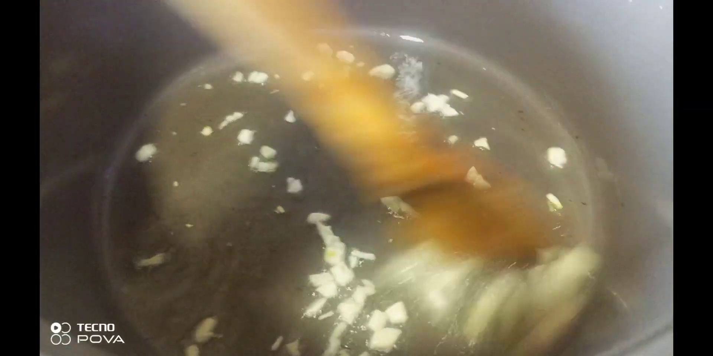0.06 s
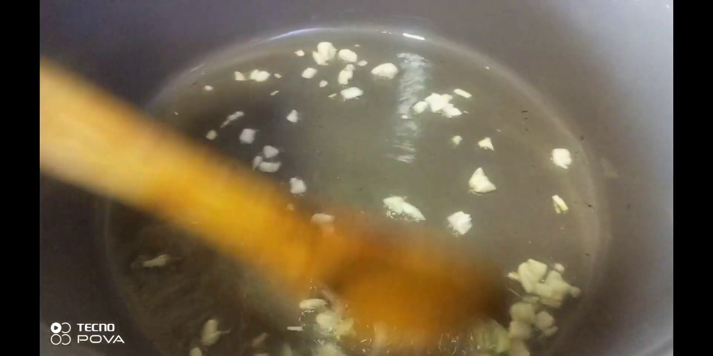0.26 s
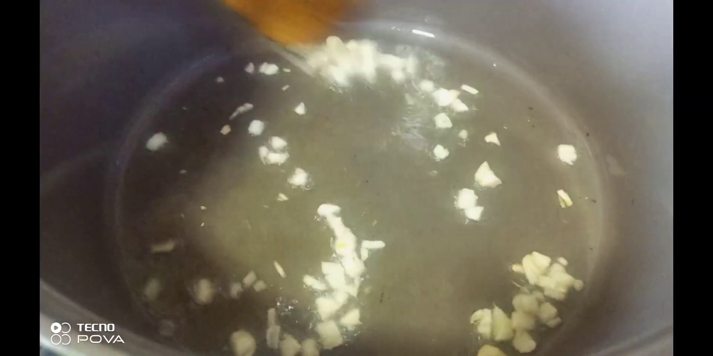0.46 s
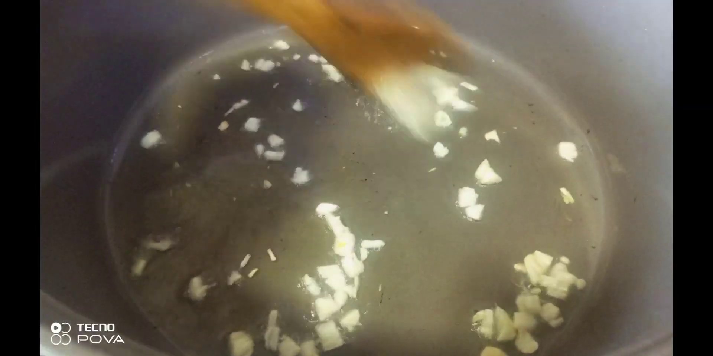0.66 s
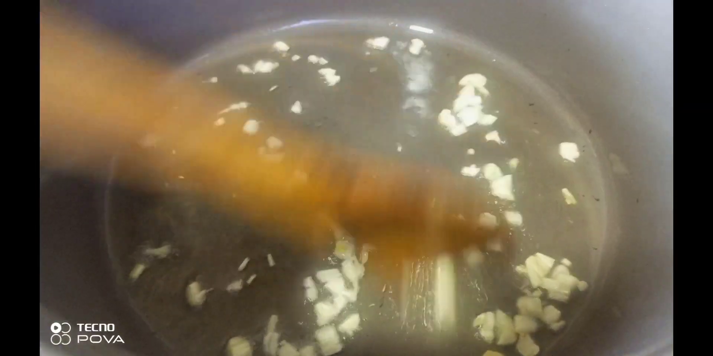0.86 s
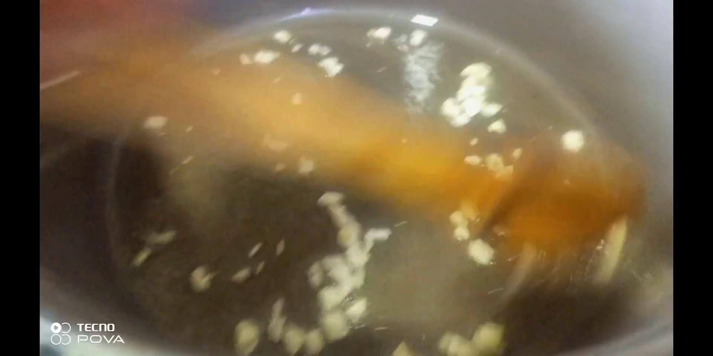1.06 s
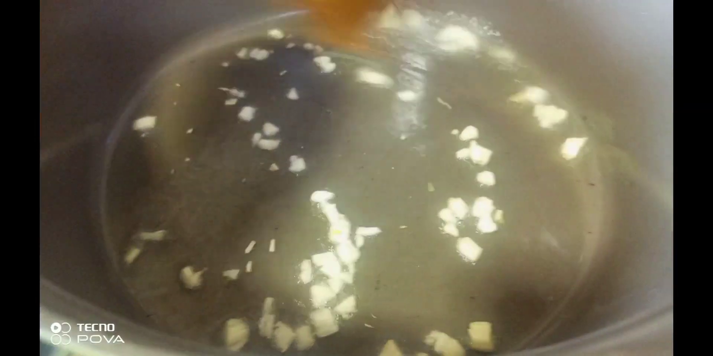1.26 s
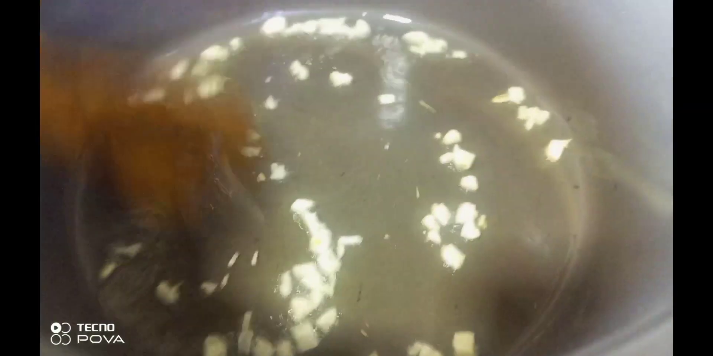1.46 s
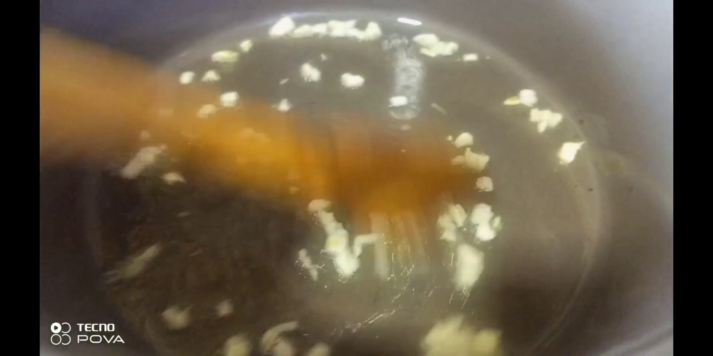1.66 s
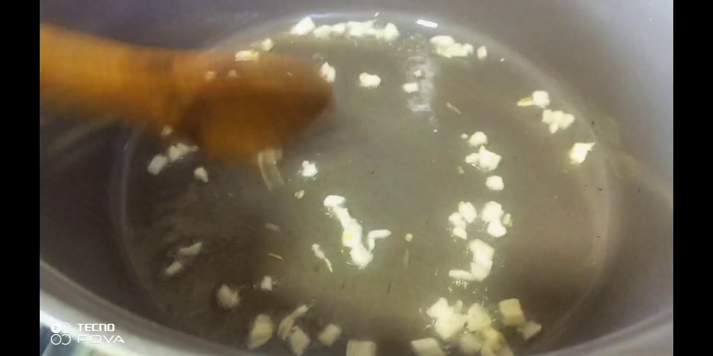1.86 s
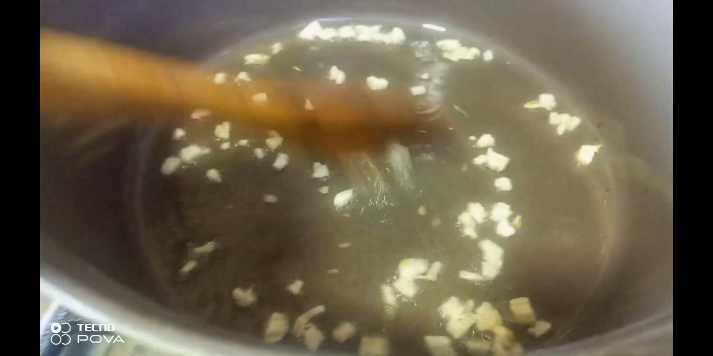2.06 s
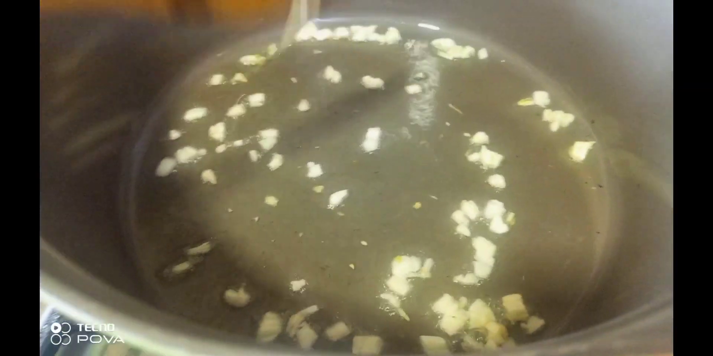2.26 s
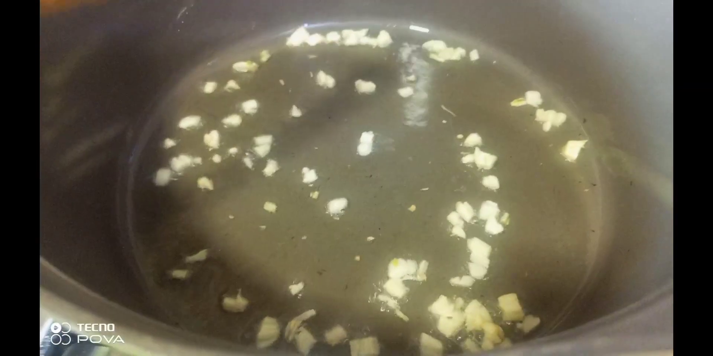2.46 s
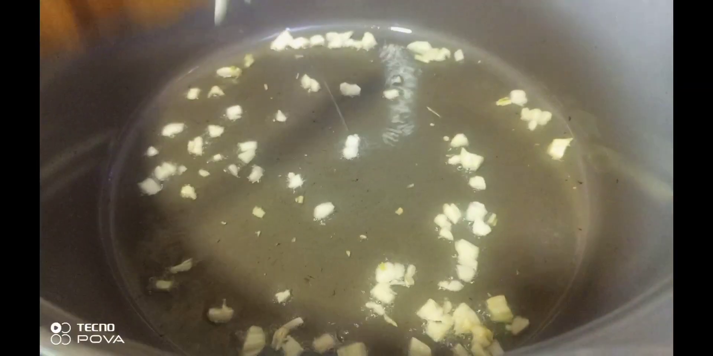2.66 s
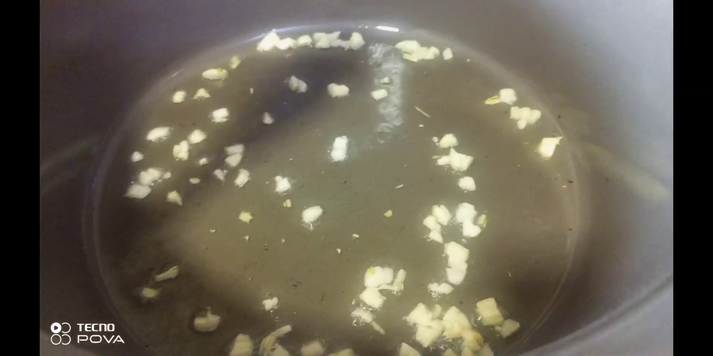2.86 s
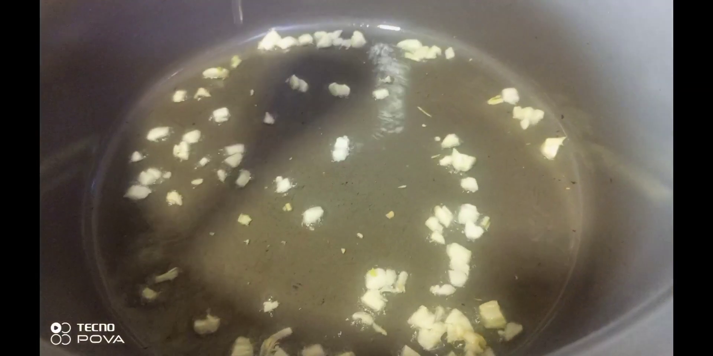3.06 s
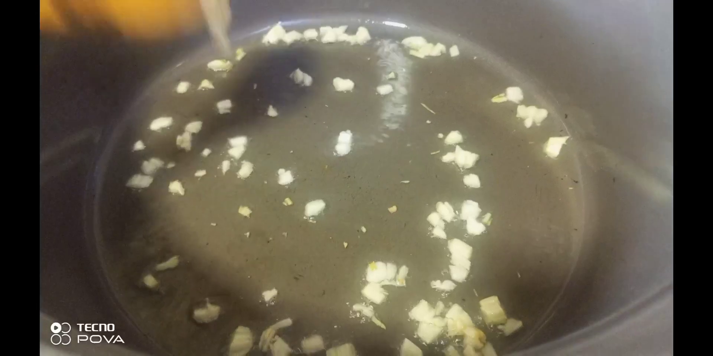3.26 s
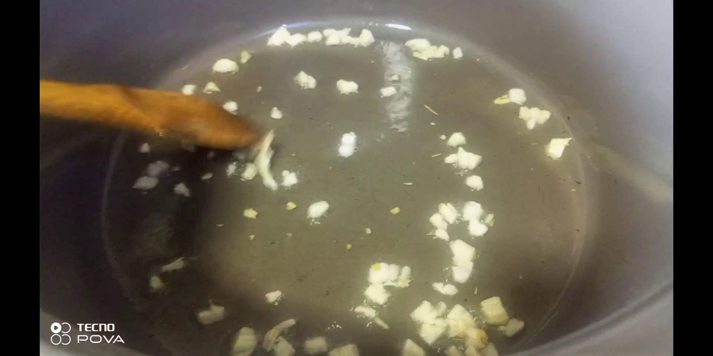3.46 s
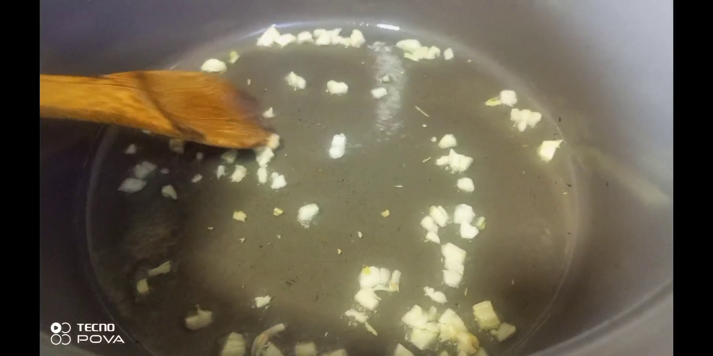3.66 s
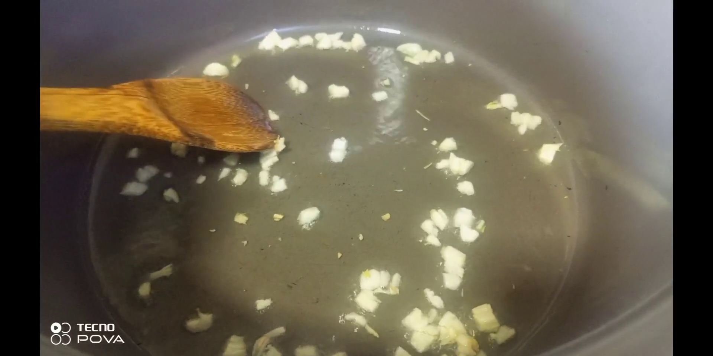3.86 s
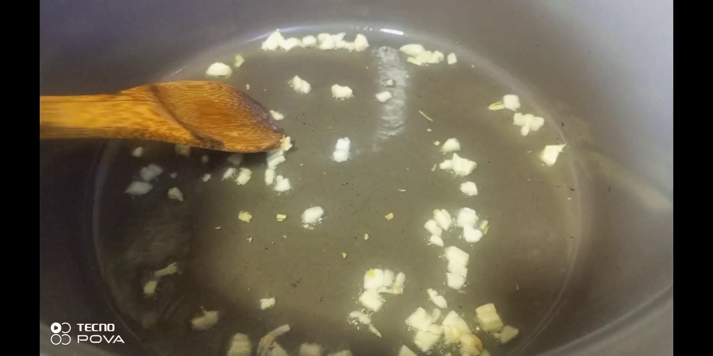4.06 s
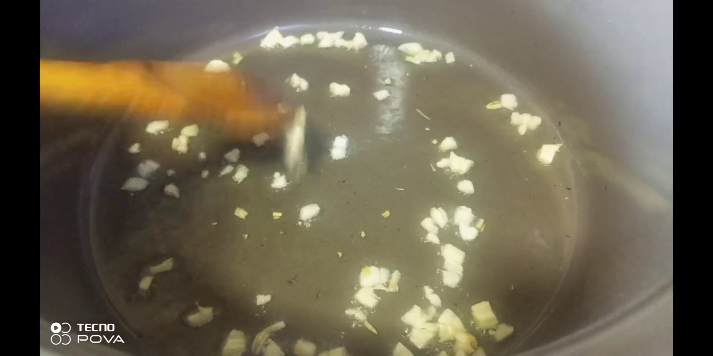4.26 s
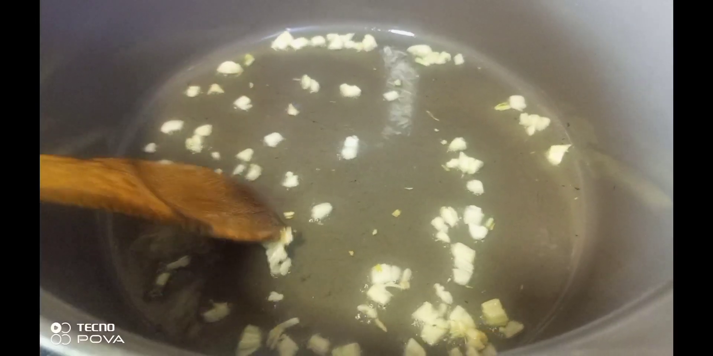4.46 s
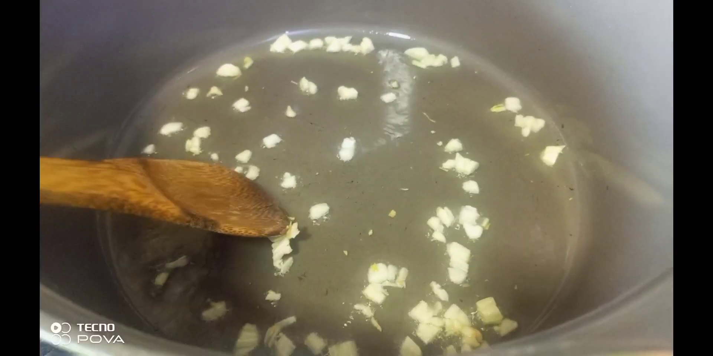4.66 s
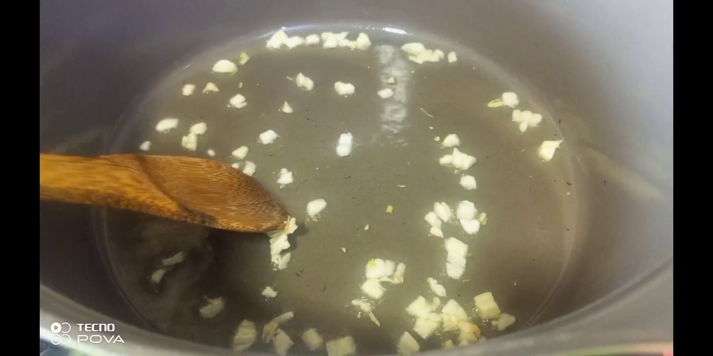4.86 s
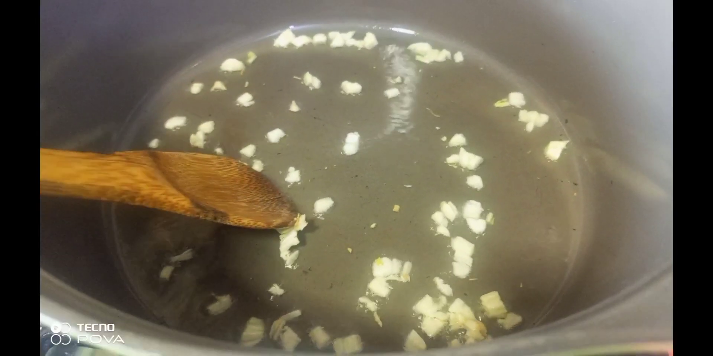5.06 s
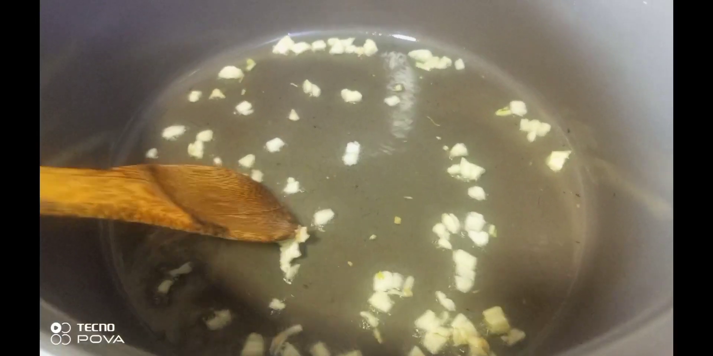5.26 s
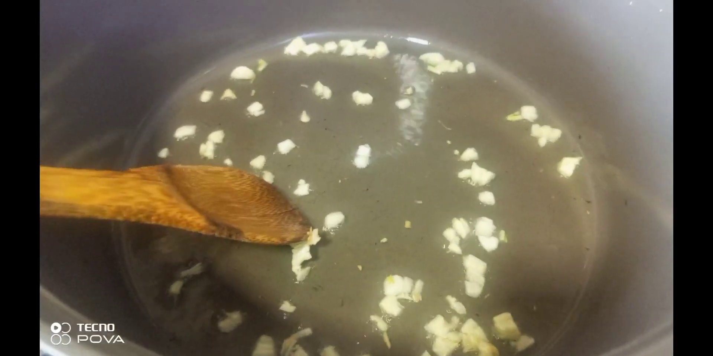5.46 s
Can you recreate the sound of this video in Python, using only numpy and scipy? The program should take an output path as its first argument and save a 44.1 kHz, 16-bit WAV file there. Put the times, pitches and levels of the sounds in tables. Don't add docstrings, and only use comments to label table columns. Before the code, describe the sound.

Steady light sizzling of oil with sharp, ringing pops and tiny droplet ticks, heard close and fairly dry. Two small wooden clicks and light taps come during stirring, followed by stronger knocks on the pot's rim, the last one doubled. Each knock rings briefly and thumps the stove, the tail cut short by phone noise reduction; then only soft, sparse frying remains.

```python
import sys
import numpy as np
from scipy import signal
from scipy.fft import rfft, irfft, next_fast_len
from scipy.io import wavfile
from scipy.ndimage import uniform_filter1d

SR = 44100
rng = np.random.default_rng(int(sys.argv[2]) if len(sys.argv) > 2 else 0)


def voltage_ratio(level):
    return 10 ** (np.asarray(level, float) / 20)


def transcribe(signal):
    frames = np.atleast_2d(signal).T
    limited = np.clip(frames, -1, 1)
    pcm = np.round(limited * 32767).astype(np.int16)
    wavfile.write(sys.argv[1], SR, pcm)


N = 242991

# (frequency [Hz], density [dB])
FIZZ_SPECTRUM = [(350, -75), (600, -21), (705, -30.5), (899, -16), (1230, -19.5), (1380, -8.5), (1530, -15),
                 (1820, -10), (2240, -9), (5650, 4), (6720, 4), (7990, -7.5), (9500, -9), (12400, -47),
                 (20900, -120)]
# (frequency [Hz], density [dB])
AIR_SPECTRUM = [(4120, -26), (7000, -6), (8310, -22), (9970, -10.5), (12400, -22.5), (13700, -15.5),
                (14800, -7.5), (15600, -7)]
# (frequency [Hz], density [dB])
HUM_SPECTRUM = [(15, -50), (25, -11), (48, -9), (119, -7.5), (230, -12.5), (465, -8.5), (687, -27),
                (900, 3), (1170, -26), (1980, -120)]
# (frequency [Hz], density [dB])
WOOD_SPECTRUM = [(290, 1), (500, -43), (709, -26), (906, -4), (1560, -2.5), (2690, 2), (3100, 1), (3660, 0),
                 (5760, 2), (11000, -43), (14300, -76), (22000, -120)]
# (time [s], fizz level [dB])
STIR = [(0, -53.5), (.85, -56.5), (1.6, -54.5), (2.06, -56), (2.44, -59.5), (2.7, -58), (3.11, -59),
        (3.6, -58), (4.24, -60), (4.87, -60), (5.51, -59)]
# (time [s], length [s], air lift [dB])
SWEEPS = [
    (1.196, 0.72, 2),
    (1.82, 0.52, 4),
]

# (time [s], peak [dB], pitch [Hz], tail t60 [s])
LARGE_POPS = [(0.042, -32, 4400, 0.13), (0.1, -33.5, 5140, 0.13), (.161, -33, 4330, 0.1),
              (0.223, -35.5, 4670, 0.13), (0.449, -37.5, 4870, 0.13), (0.82, -30.5, 4357, 0.092),
              (0.875, -41.5, 4650, 0.23), (1.12, -29, 5030, 0.12), (1.3793, -30.5, 4560, 0.14),
              (1.7873, -42.5, 3250, 0.15), (1.878, -40, 4240, 0.27), (1.925, -33, 5110, 0.089),
              (1.9394, -37, 5010, 0.17), (2.05, -47.5, 4330, 0.28), (2.151, -40, 4430, 0.15),
              (2.2795, -36, 4330, 0.15), (2.3077, -35, 4025, 0.19), (2.523, -30.5, 4510, 0.1),
              (2.554, -32, 4080, 0.14), (2.653, -40.5, 3770, 0.13), (2.82, -38.5, 4850, 0.13),
              (2.9798, -37, 4420, 0.18), (3.106, -37, 4750, 0.21), (3.3479, -35.5, 4800, 0.18),
              (3.525, -36, 3764, 0.16), (4.6445, -37, 4880, 0.17), (5.202, -39, 4960, 0.27)]
# (time [s], peak [dB], pitch [Hz], tail t60 [s])
MIDDLE_POPS = [(0.1668, -31, 5250, 0.078), (0.222, -36, 5770, 0.096), (.2768, -48, 5590, .11),
               (.823, -34, 5300, 0.12), (1.054, -36, 5910, 0.16), (1.102, -30, 5700, 0.063),
               (1.1216, -28, 5470, 0.052), (1.5641, -31.5, 5770, 0.13), (1.7513, -27.5, 5770, 0.19),
               (1.8978, -37.5, 5500, 0.088), (1.9257, -28.5, 5526, 0.099), (2.052, -28.5, 5780, 0.16),
               (2.119, -34.5, 5740, 0.09), (2.3322, -38, 6090, 0.088), (2.4453, -42, 5880, .1),
               (3.002, -37.5, 5710, 0.17), (3.3437, -31.5, 5400, 0.097), (3.3756, -34, 5650, 0.089),
               (3.3838, -32, 5520, 0.066), (3.554, -25, 5780, 0.07), (3.712, -34, 5570, 0.15),
               (4.2515, -26, 5790, 0.24), (4.415, -36.5, 5670, 0.11)]
# (time [s], peak [dB], pitch [Hz], tail t60 [s])
SMALL_POPS = [(0.3328, -35, 6210, 0.084), (0.5497, -25.5, 6010, 0.079), (0.706, -35.5, 6260, 0.14),
              (.9797, -45, 6130, 0.054), (1.218, -30, 6950, 0.086), (1.391, -34, 5920, 0.19),
              (1.474, -28.5, 7000, 0.043), (1.866, -37, 6560, 0.23), (2.378, -31.5, 6800, 0.13),
              (2.5227, -38, 6630, .086), (2.552, -31.5, 6100, 0.065), (2.6324, -52, 6090, .14),
              (2.645, -29.5, 6260, 0.1), (2.7929, -32, 6020, 0.083), (4.5405, -35.5, 5900, 0.091),
              (4.56, -33.5, 6870, 0.065), (4.916, -42, 6780, 0.12)]
# (time [s], peak [dB], pitch [Hz])
FAINT_POPS = [(0.012, -46, 6400), (0.0233, -47, 6980), (0.414, -38.5, 6010), (0.853, -38, 6000),
              (1.509, -44, 6500), (2.2616, -45, 6800), (2.87, -44.5, 5910), (2.8894, -43, 6420),
              (3.082, -46.5, 6040), (3.4184, -35, 6530), (3.5905, -41.5, 7010), (4.659, -49, 6740),
              (4.7496, -48, 6600), (4.935, -42.5, 6400), (5.434, -45, 5500)]
# (width of pot modes rung [Hz], burst against tail [dB])
BUBBLE_SIZES = [
    (280., -20),
    (420., -3.5),
    (420., -4.5),
    (1200., -2.5),
]
# (time [s], peak [dB], pitch [Hz])
SPITS = [(0.3335, -53, 8900), (0.4798, -47, 8000), (0.8011, -44.5, 8280), (1.1603, -47.5, 8460),
         (1.4746, -44, 8040), (1.9648, -43.5, 8600), (2.6035, -49.5, 9200), (3.9399, -54.5, 10200),
         (4.252, -40.5, 8100), (5.1625, -48, 8900), (5.206, -41.5, 8550)]
# (time [s], peak [dB], pitch [Hz], tail t60 [s])
CRACKS = [(.042, -32.5, 4400, 0.027), (4.5595, -31.5, 6900, 0.035), (4.563, -41, 5600, .05),
          (4.669, -41.5, 6100, 0.16), (.151, -49, 4800, .1), (0.015, -52, 5500, .03),
          (0.022, -41, 5300, .03), (0.42, -46.5, 3530, 0.034), (.265, -46, 3600, 0.09),
          (1.378, -38, 4500, .04)]
# (time [s], peak [dB], pitch [Hz], tail t60 [s])
NARROW_POPS = [(.139, -40, 6240, 0.095), (.3145, -36, 7000, .04), (0.502, -37, 5860, 0.046),
               (0.599, -42.5, 5430, 0.1), (.885, -37.5, 7180, 0.07), (1.096, -33, 5300, 0.065),
               (1.3107, -45.5, 5480, 0.12), (1.757, -26, 6100, 0.031), (1.911, -39, 7140, .05),
               (2.9544, -40.5, 6860, .06), (3.762, -43, 7300, .05), (3.942, -48, 4200, 0.17),
               (3.9865, -42.5, 5750, 0.14), (4.000, -39, 4930, .05), (4.527, -48, 6080, 0.049),
               (5.1597, -52, 5890, .06), (0.0424, -33, 4450, 0.039), (.055, -48, 6500, 0.042),
               (.068, -35, 5600, .06), (.2915, -34, 5700, 0.1), (0.2764, -31, 5540, .04),
               (.7045, -30.5, 6320, 0.033), (4.559, -30, 6810, 0.024), (.115, -46, 6000, .05),
               (1.746, -25, 6250, 0.07), (1.966, -45, 2660, 0.079), (2.02, -47, 5040, .04),
               (2.281, -34.5, 6520, 0.059)]
# (time [s], peak [dB], pitch [Hz])
DROPLETS = [(0.192, -45, 8000), (0.206, -46, 10700), (0.272, -59, 10100), (0.3112, -49, 8000),
            (0.411, -52, 8000), (0.4534, -44, 8000), (0.7248, -55, 8000), (0.7447, -46, 8000),
            (0.8495, -44, 8000), (0.98, -41, 6600), (1.05, -58, 8000), (1.3404, -44, 8300),
            (1.585, -48, 8000), (1.605, -43, 8000), (1.7434, -61, 8000), (1.8414, -50, 8000),
            (2.374, -58, 8000), (2.5237, -42, 7950), (2.9427, -46, 8000), (3.3323, -55, 8000),
            (3.7813, -49, 8000), (4.0542, -50, 8000), (4.123, -47, 7760), (5.3453, -54, 8000)]
# (time [s], peak [dB], centre [Hz], t60 [s])
CONTACTS = [(0.2772, -22, 2730, 0.029), (.2935, -35, 2080, 0.072), (.905, -49, 2100, 0.11),
            (1.664, -49, 2500, .03), (2.552, -40.5, 2050, 0.098), (3.372, -31, 2140, 0.076),
            (3.422, -35, 452, 0.05), (3.523, -44.5, 2140, 0.19), (4.413, -40.5, 1920, 0.22),
            (1.437, -48, 360, 0.087), (3.876, -57, 450, 0.07), (4.68, -50.5, 320, 0.13),
            (.772, -56, 397, 0.071), (1.964, -46, 11000, .05), (.3325, -46, 10500, 0.027),
            (1.473, -42, 7440, 0.008)]

# (frequency [Hz], width [Hz], level
# [dB])
FRYING_MODES = [(302, 9.2, -25.5), (495, 23, -32.5), (904, 6.6, -21.5), (1420, 5, -16), (1857, 40, -31),
                (2690, 23, -14)]
# (frequency [Hz], width [Hz], level [dB])
FLOOR_MODES = [(4400, 19, -1), (5770, 37, 1), (6870, 38, -0.5), (3733, 16, -3.5)]

# (time [s], ring [dB], clatter [dB], clatter t60 [s], suppressor cut after [s])
BLOWS = [
    (.2765, -37.5, -45, 0.16, 0.11),
    (.903, -48, -56, 0.095, 0.079),
    (2.4435, -42.5, -42.5, 0.17, .1),
    (3.372, -32, -36.5, 0.17, 0.18),
    (4.2495, -30, -35.5, 0.26, 0.12),
    (4.412, -40, -42.5, 0.23, 0.083),
]
# (time [s], clatter [dB], clatter t60 [s])
TAPS = [
    (1.376, -54, 0.075),
    (1.6036, -37, 0.041),
    (1.786, -51, 0.11),
    (2.281, -61, 0.08),
    (2.522, -44.5, 0.18),
    (4.054, -64, 0.057),
]
# (time [s], peak [dB], pitch [Hz], tail t60 [s], contact against tail [dB])
CLICKS = [
    (0.2793, -26, 3476, 0.25, 9),
    (0.906, -28, 3540, 0.15, 1.5),
    (1.606, -41, 4710, 0.059, 4),
]
# (frequency [Hz], level [dB], t60 [s])
FLOOR_RINGS = [
    [(1365, -15, 0.22), (2140, -8, 0.086), (2920, 1, 0.14), (3700, -7.5, 0.26), (5530, -9.5, 0.31)],
    [(2410, -9, 0.15), (2710, 2, 0.08), (3700, -1.5, 0.24), (4550, -22, 0.072)],
]
# (frequency [Hz], t60 [s], level at each of the next four blows [dB] x 4)
RIM_MODES = [(1673, 0.062, 6, -21, -30, -27), (1760, 0.36, -16, -36, -19, -15),
             (2070, 0.23, -37, -28, -42, -14), (2100, 0.2, -27, -21, -42, -7),
             (2657, 0.37, -10, -19, -10.5, -8), (3337, 0.19, 0, -10, -4.5, -3.5),
             (3390, 0.28, -14, -13, -8.5, -19), (3697, 0.17, 2, -5, 0.5, -5),
             (3975, 0.24, -7, -19, -6.5, -10), (4097, 0.12, -2, -7, -4.5, -0.5),
             (5590, 0.18, -22, -11, -18, -4), (5480, 0.71, -13, -24, -34, -26),
             (6100, 0.23, -26, -29, -20, -27), (6460, 0.37, -22, -16.5, -15, -24)]
# (time [s], frequency [Hz], level [dB], t60 [s], damped after [s])
BELL_RINGS = [(1.377, 1420, -63, 0.2, .06), (1.789, 1420, -53, 0.13, .1), (1.790, 904, -62, 1.3, 0.053),
              (1.915, 904, -62.5, .87, 0.03), (2.000, 904, -62.5, 0.24, 0.034),
              (2.300, 1445, -60, 0.21, 0.037), (2.4435, 1289, -44, 1.94, 0.66), (3.14, 1270, -76, 1.5, 0.2),
              (2.4432, 1857, -56.5, 0.86, .26), (2.444, 904, -49.5, 4, 0.69),
              (3.150, 904, -65.5, 4.3, 0.17), (3.370, 1365, -51.5, 1.1, .17), (3.372, 904, -43, 0.39, 0.19),
              (3.3721, 1287, -65, 2, 0.3), (3.3718, 1857, -44.5, 0.8, 0.31),
              (4.055, 1857, -66.5, 0.45, .11), (4.0547, 1410, -55.5, 0.074, .05),
              (4.2475, 1857, -49.5, 0.58, 0.18), (4.2495, 904, -44, 1.17, .22),
              (4.2496, 873, -46.5, 0.6, .2), (4.2497, 1372, -52, 1.6, 0.26),
              (4.251, 1290, -43.5, 1.2, 0.166), (4.412, 902, -47, 0.27, 0.066),
              (4.4116, 2354, -54, 0.87, 0.069), (4.414, 1282, -38, 0.8, 0.055)]
# (time [s], frequency [Hz], level
# [dB], t60 [s], damped after [s])
SHORT_RINGS = [(.277, 904, -53.5, 0.21, 0.023), (.28, 305, -71, 0.33, 0.035), (.3, 495, -73, 0.43, 0.056),
               (.549, 904, -66, .4, 0.036), (2.444, 495, -42, 0.24, 0.047), (2.444, 426, -37.5, 0.18, .06),
               (2.445, 1690, -44, .15, .035), (2.444, 931, -48, 0.9, 0.28), (3.952, 2690, -63, 0.18, .02),
               (4.998, 2120, -67, .4, 0.03), (4.25, 2977, -66, .2, .08), (4.25, 5000, -48, .15, .08),
               (4.25, 5770, -42, 0.22, .08), (4.413, 2220, -52, 0.37, 0.067),
               (4.413, 5600, -60, 0.18, 0.056), (4.413, 1398, -48.5, 0.39, .09),
               (2.444, 526, -45, 0.22, 0.046), (2.446, 173, -49.5, 1.2, 0.38),
               (2.46, 441, -49.5, 1.3, 0.427), (3.375, 491.7, -48, 0.87, .2),
               (3.375, 158.8, -50, 0.93, 0.22), (1.49, 904, -65, .4, 0.032), (2.279, 2140, -61, 0.15, .04),
               (1.215, 1400, -66, 0.29, 0.034), (3.374, 3500, -50, 0.33, 0.11),
               (4.413, 3314, -47, 0.33, .065), (4.413, 2170, -49, 0.43, .065)]
# (time [s], frequency [Hz], level [dB], t60
# [s], damped after [s])
MORE_RINGS = [(.736, 904, -66.5, 0.41, 0.024), (2.921, 1450, -72, 1.1, 0.075), (3.252, 301, -63, .5, 0.031),
              (4.251, 497, -51, 0.5, .15), (4.406, 171, -54.5, 0.38, .05), (4.441, 499, -58, 0.45, 0.057),
              (4.481, 1325, -61, .6, 0.1), (4.641, 4900, -40, 0.22, 0.016)]

# (frequency [Hz], width [Hz], level [dB])
STOVE_PARTS = [
    [(166, 46, -4.5), (205, 45, -18)],
    [(82.4, 48, 0)],
    [(299.5, 21.7, -1), (364, 35, -6)],
    [(437.4, 40, 3.5), (496, 34, 3), (650, 1900, -4)],
]
# (time [s], length [s], level [dB], deep part [dB], upper part [dB])
KNOCK_BOOMS = [
    (1.435, 0.11, -61, 3.5, 2),
    (1.857, 0.14, -94.5, 15, 23.5),
    (2.442, 0.52, -45.5, -9, 2),
    (3.374, 0.32, -50.5, -12, -1),
    (4.046, 0.093, -77.5, -24, 8.5),
    (4.247, 0.22, -56.5, 3, 5.5),
    (4.407, 0.19, -66.5, 5.5, 10.5),
]
# (time [s], length [s], level [dB], deep part [dB], middle part [dB])
THUDS = [
    (0.44, 0.43, -88.5, 16, 1),
    (0.769, 0.079, -86, 13, 21.5),
    (2.228, 0.11, -71, 5.5, 2),
    (2.898, 0.091, -72.5, 4, 5),
    (3.243, 0.07, -80, 8.5, 0),
    (3.875, 0.079, -69, 6, 4),
    (4.676, 0.17, -71.5, 5.5, 6),
    (5.484, .12, -63.5, 2, 3.5),
]
# main, deep, middle, upper [dB/s]
SAG_DB_PER_S = [-23.5, -56, -21, -49]
# main, deep, middle, upper [dB]
RELEASE_DROP_DB = np.array([-24.5, -17.0, -32.0, -32.5])

HUM_DB, AIR_DB, AIR_WAVER_DB = -80.5, -69.5, -0.05
OPEN_AT_DB, OPEN_SOFT_DB, AIR_LIFT_DB, FIZZ_LIFT_DB = -54, 3, 8, 4
SPRAY_PER_S, SPRAY_HZ, SPRAY_WIDTH_HZ, SPRAY_DB = 24, 6700, 6600, -18.5
FAINT_T60_S, TAP_CHOP_S, RING_ROUGH_DB = 0.075, 0.115, 2.0
BELL_DAMP_T60_S, BELL_WAVER_DB = 0.09, 1.4
BOOM_ATTACK_S, BOOM_HOLD_SHARE = 0.002, 0.45
MIDDLE_UNDER_KNOCK_DB, UPPER_UNDER_THUD_DB = -5.5, -10


def curve(table):
    s, *columns = np.transpose(table)
    return [np.interp(np.arange(N) / SR, s, c) for c in columns]


def unit(x):
    return x / np.sqrt(np.mean(x ** 2) + 1e-30)


def colour(x, points):
    hz, db = np.transpose(points)
    size = next_fast_len(len(x), real=True)
    log_f = np.log(np.maximum(np.fft.rfftfreq(size, 1 / SR), 1))
    gain = voltage_ratio(np.interp(log_f, np.log(hz), db, left=-120, right=-120))
    return irfft(rfft(x, size) * gain, size)[:len(x)]


def resonance(x, hz, width_hz):
    return signal.lfilter(*signal.iirpeak(min(hz, SR / 2.2), hz / width_hz, fs=SR), x)


def resonance2(x, hz, width_hz):
    return resonance(resonance(x, hz, width_hz), hz, width_hz)


def add(out, s, sound):
    i = max(int(s * SR), 0)
    out[i:i + len(sound)] += sound[:N - i]


def fade(t, t60):
    return np.exp(-np.log(1000) * t / t60)


def smooth(x, size):
    return uniform_filter1d(uniform_filter1d(x, size), size)


def walk(rate_hz):
    k = int(SR / rate_hz)
    return unit(smooth(np.repeat(rng.standard_normal(N // k + 1), k), k)[:N])


def pop(chance, hz, t60, burst_db, spread_hz, burst_s=0.00065):
    t = np.arange(len(chance)) / SR
    burst = np.exp(-((t - .004) / burst_s) ** 2) * np.sin(2 * np.pi * hz * t)
    modes = 0
    for k in range(4):
        mode_hz = hz + .5 * spread_hz * chance[k]
        modes = modes + np.sin(2 * np.pi * mode_hz * t + 3 * chance[k + 5])
    blur = unit(resonance(resonance(chance, hz, spread_hz), hz, 3.7 * spread_hz))
    skirt = unit(resonance(resonance(chance[::-1], 0.84 * hz, 2600), 0.79 * hz, 2700)) * fade(t, .5 * t60)
    held = fade(t, 0.95 * t60) * np.exp(-(t / (0.35 * t60)) ** 3)
    tail = (voltage_ratio(-13.0) * modes + voltage_ratio(-11.5) * blur) * held + voltage_ratio(-18.5) * skirt
    return voltage_ratio(burst_db) * burst + (1 - np.exp(-t / 0.0028)) * tail


def add_pops(out, rows, burst_db, spread_hz, samples, burst_s=0.00065):
    for s, db, hz, t60 in rows:
        chance = rng.standard_normal(samples)
        add(out, s - .004, voltage_ratio(db) * pop(chance, hz, max(t60, .02), burst_db, spread_hz, burst_s))


def ticks():
    size_db = np.minimum(32.0 * rng.exponential(size=N), 14)
    return unit((rng.random(N) < 260 / SR) * rng.choice([-1, 1], N) * voltage_ratio(size_db))


def spray():
    out, t = np.zeros(N), np.arange(SR // 100) / SR
    for when, size, pitch in rng.random((int(SPRAY_PER_S * N / SR), 3)):
        noise = rng.standard_normal(len(t)) * fade(t, 0.0041)
        click = resonance2(noise, SPRAY_HZ * (.7 + .5 * pitch), SPRAY_WIDTH_HZ)
        add(out, when * N / SR, voltage_ratio(5.5 * size ** 2) * click)
    return unit(out)


def fizz(fizz_db):
    hiss = voltage_ratio(-3.5) * ticks()
    for hz in 700 * 2 ** np.arange(0, 4, .4):
        flicker = voltage_ratio(2.4 * walk(30) + 0.35 * walk(2.6))
        hiss = hiss + flicker * unit(resonance(rng.standard_normal(N), hz, hz / 4.4)) / 3
    small = np.zeros(N)
    for when, pitch, size, short in rng.random((900, 4)):
        note = pop(rng.standard_normal(SR // 30), 3600 + 4000 * pitch ** .7, 0.016 + 0.032 * short, -8.0,
                   spread_hz=400 + 1400 * (1 - short) ** 2, burst_s=0.00013)
        add(small, when * N / SR, note * voltage_ratio(10.0 * size ** 4.5))
    crackle = voltage_ratio(-3.5 + 0.85 * (fizz_db + 53.5)) * unit(small)
    droplets = voltage_ratio(SPRAY_DB + 0.58 * (fizz_db + 57.5)) * spray()
    return unit(colour(hiss, FIZZ_SPECTRUM)) + crackle + droplets


def kitchen_air(opening):
    spray_db = np.zeros(N)
    for s, length_s, db in SWEEPS:
        add(spray_db, s, db * np.hanning(int(length_s * SR)))
    waver_db = AIR_WAVER_DB * walk(5.2) + 1.2 * walk(40)
    air_db = AIR_DB + spray_db + AIR_LIFT_DB * opening + waver_db
    return voltage_ratio(air_db) * unit(colour(rng.standard_normal(N) + voltage_ratio(-12.0) * ticks(), AIR_SPECTRUM))


def hum():
    return voltage_ratio(HUM_DB) * unit(colour(rng.standard_normal(N), HUM_SPECTRUM))


def pops():
    out = np.zeros(N)
    faint = [(s, db, hz, FAINT_T60_S) for s, db, hz in FAINT_POPS]
    groups = (LARGE_POPS, MIDDLE_POPS, SMALL_POPS, faint)
    for bubbles, (spread_hz, burst_db) in zip(groups, BUBBLE_SIZES):
        add_pops(out, bubbles, burst_db, spread_hz, SR // 6)
    spits = [(s, db, hz, 0.059) for s, db, hz in SPITS]
    add_pops(out, spits, -1.0, 2400, SR // 20, burst_s=0.00061)
    return out


def pot(frying):
    push = uniform_filter1d(np.abs(frying), 200) * rng.standard_normal(N)
    wall = sum(voltage_ratio(db + 16.0) * resonance(push, hz, width_hz) for hz, width_hz, db in FRYING_MODES)
    floor = sum(voltage_ratio(db) * resonance(frying, hz, width_hz) for hz, width_hz, db in FLOOR_MODES)
    return wall + floor


def cracks():
    out = np.zeros(N)
    add_pops(out, CRACKS, 0.5, 605, SR // 8, burst_s=0.001)
    return out


def small_events():
    out, t = np.zeros(N), np.arange(SR // 8) / SR
    add_pops(out, NARROW_POPS, -9.5, 207, SR // 8)
    touches = [(s, db + 0.5, hz, .025, .45) for s, db, hz in DROPLETS] + [(*row, .9) for row in CONTACTS]
    for s, db, hz, t60, breadth in touches:
        noise = unit(resonance2(rng.standard_normal(len(t)), hz, breadth * hz))
        add(out, s - .001, voltage_ratio(db - 9.0) * noise * fade(t, t60) * (1 - np.exp(-t / 0.00024)))
    return out


def blows():
    out, t = np.zeros(N), np.arange(SR // 2) / SR
    rings = FLOOR_RINGS + [[(row[0], row[2 + k], row[1]) for row in RIM_MODES] for k in range(4)]
    taps = [(s, 0, db, t60, TAP_CHOP_S) for s, db, t60 in TAPS]
    for k, (s, ring_db, clatter_db, clatter_t60, chop_s) in enumerate(BLOWS + taps):
        chance = rng.standard_normal(len(t))
        sound = voltage_ratio(clatter_db) * unit(colour(chance, WOOD_SPECTRUM)) * fade(t, clatter_t60)
        for hz, db, t60 in rings[k] if k < len(rings) else []:
            phase, twin, split = rng.random(3)
            twin_hz = hz * (1 + 0.0025 + 0.008 * split)
            pair = np.sin(2 * np.pi * (hz * t + phase)) + 0.5 * np.sin(2 * np.pi * (twin_hz * t + twin))
            flutter = unit(smooth(np.roll(chance, int(twin * len(t))), 250))
            sound += voltage_ratio(ring_db + db + RING_ROUGH_DB * flutter) * pair * fade(t, max(t60, .02))
        add(out, s, (1 - np.exp(-t / 0.0024)) * np.exp(-(t / chop_s) ** 6.3) * sound)
    for *click, contact_db in CLICKS:
        add_pops(out, [click], contact_db, 450, SR // 6, burst_s=0.0007)
    return out


def bell(rings):
    out, t = np.zeros(N), np.arange(SR + SR // 4) / SR
    for s, hz, db, t60, held_s in rings:
        damping = fade(np.maximum(t - held_s, 0), BELL_DAMP_T60_S)
        ring = np.sin(2 * np.pi * (hz * t + rng.random())) * fade(t, t60) * damping
        add(out, s, voltage_ratio(db + BELL_WAVER_DB * walk(24)[:len(t)]) * (1 - np.exp(-t / 0.0015)) * ring)
    return out


def boom_gains():
    gains = np.zeros((4, N))
    rows = [(s, length_s, db, (0, deep, MIDDLE_UNDER_KNOCK_DB, upper))
            for s, length_s, db, deep, upper in KNOCK_BOOMS]
    rows += [(s, length_s, db, (0, deep, middle, middle + UPPER_UNDER_THUD_DB))
             for s, length_s, db, deep, middle in THUDS]
    for s, length_s, db, parts_db in rows:
        t = np.arange(int(length_s * SR)) / SR
        release = np.clip((t / length_s - BOOM_HOLD_SHARE) / (1 - BOOM_HOLD_SHARE), 0, 1)
        held_s = np.minimum(t, BOOM_HOLD_SHARE * length_s)
        shape = (1 - np.exp(-t / BOOM_ATTACK_S)) * voltage_ratio(db) * np.minimum((length_s - t) / .004, 1)
        for gain, part_db, sag, drop_db in zip(gains, parts_db, SAG_DB_PER_S, RELEASE_DROP_DB):
            add(gain, s, shape * voltage_ratio(part_db + drop_db * release + sag * held_s))
    return gains


def boom(gains):
    out = 0
    for gain, modes in zip(gains, STOVE_PARTS):
        part = 0
        for hz, width_hz, db in modes:
            noise = resonance(resonance(rng.standard_normal(N), hz, width_hz), hz, 2 * width_hz)
            part = part + voltage_ratio(db + 2.7 * walk(19)) * unit(noise)
        out = out + gain * unit(part)
    return signal.sosfilt(signal.butter(4, 45, "high", fs=SR, output="sos"), out)


def scene():
    gains = boom_gains()
    boom_db = 20 * np.log10(gains[0] + 1e-9)
    opening = .5 + .5 * np.tanh((boom_db - OPEN_AT_DB) / OPEN_SOFT_DB)
    fizz_db = curve(STIR)[0] + FIZZ_LIFT_DB * opening
    frying = voltage_ratio(fizz_db - 2.5) * fizz(fizz_db) + pops()
    background = kitchen_air(opening) + hum()
    details = cracks() + small_events()
    knocks = blows() + bell(BELL_RINGS) + bell(SHORT_RINGS) + bell(MORE_RINGS) + boom(gains)
    return (frying + pot(frying) + background + details + knocks)[None]


def top_cut(x):
    return signal.sosfilt(signal.butter(12, 15800, fs=SR, output="sos"), x)


def record(dry):
    low_pass = signal.ellip(8, .2, 70, 15750, fs=SR, output="sos")
    mix = signal.sosfilt(low_pass, dry)
    return top_cut(mix)


dry = scene()
out = record(dry)
transcribe(out)
```